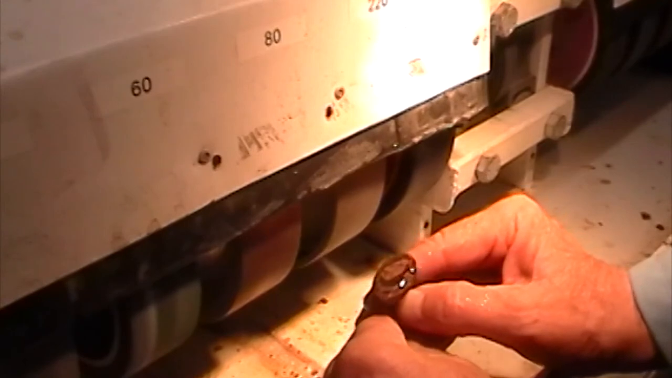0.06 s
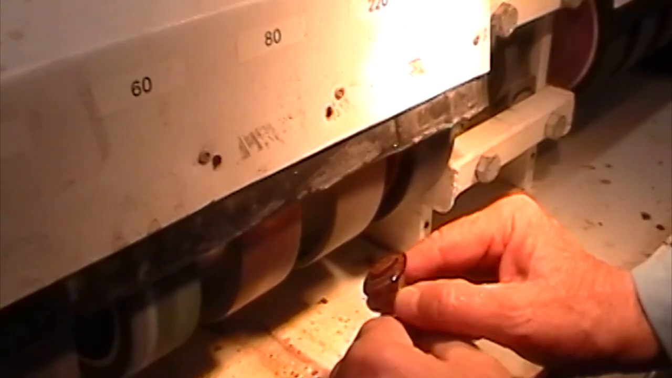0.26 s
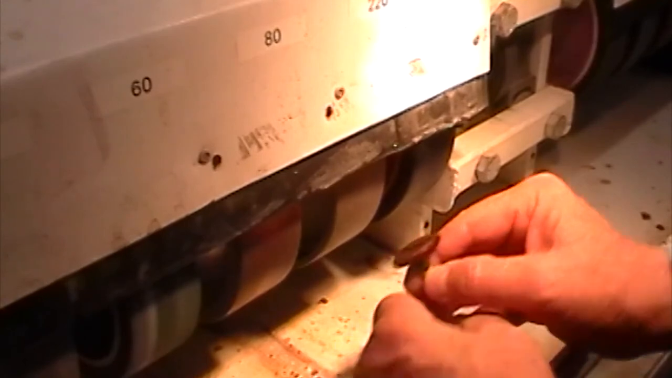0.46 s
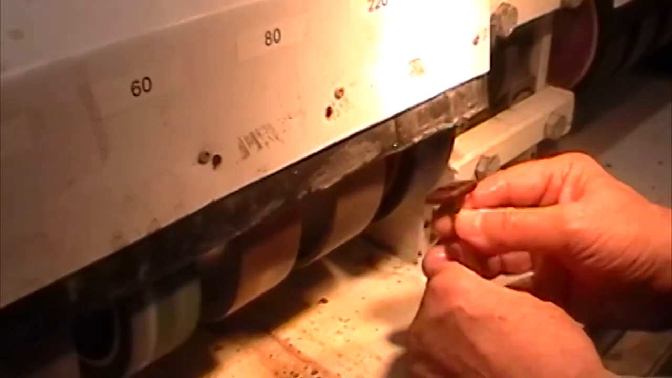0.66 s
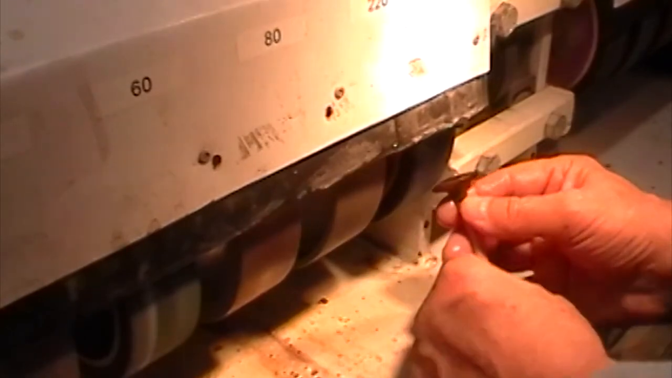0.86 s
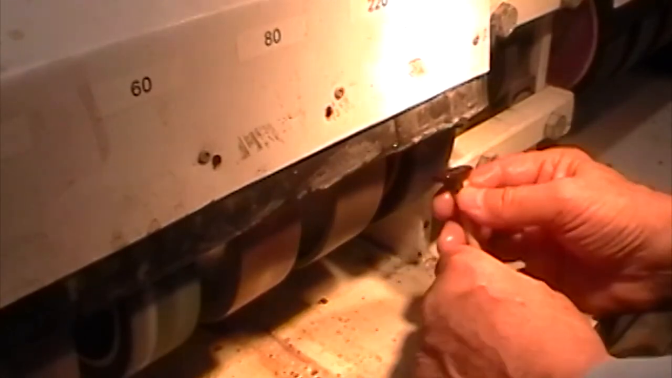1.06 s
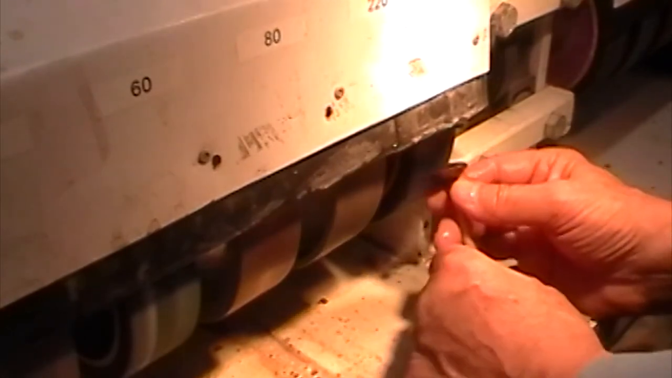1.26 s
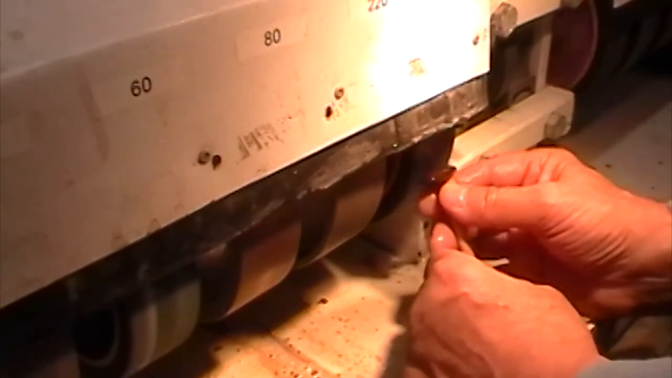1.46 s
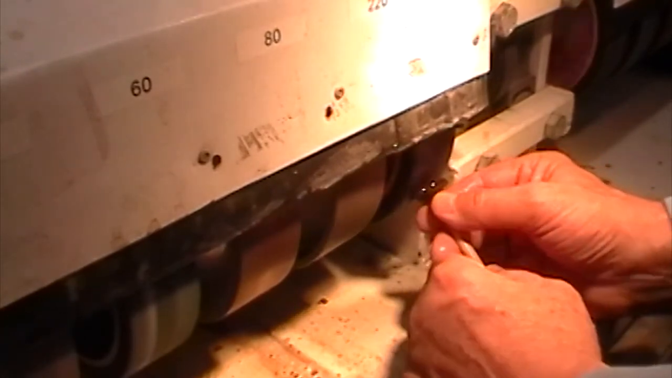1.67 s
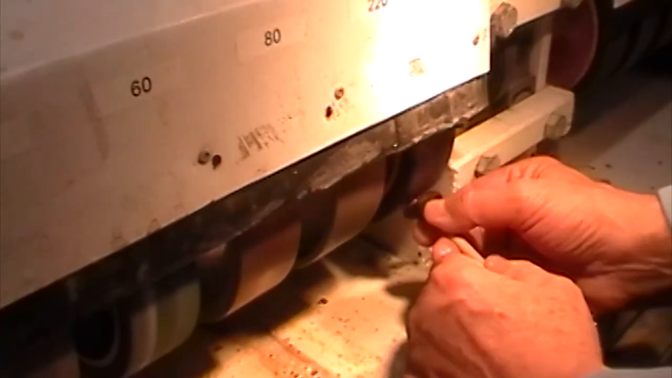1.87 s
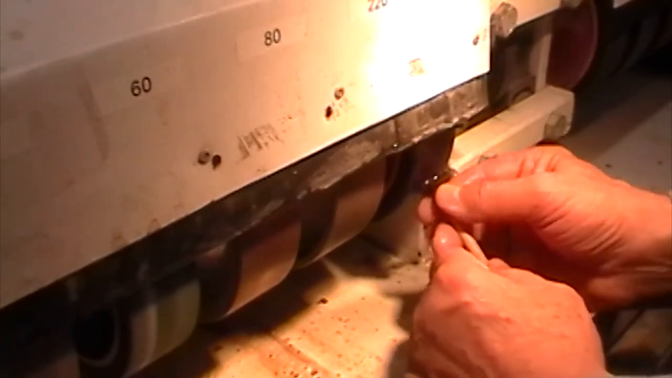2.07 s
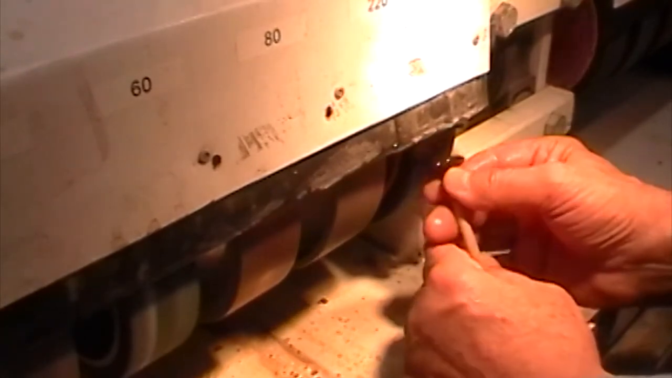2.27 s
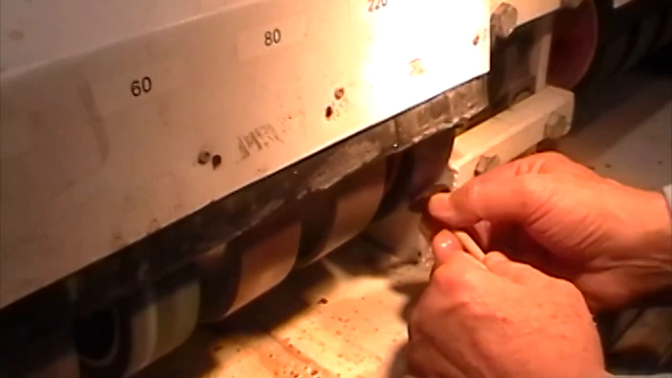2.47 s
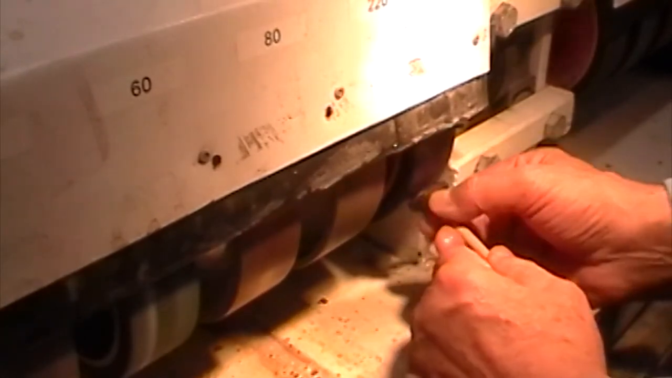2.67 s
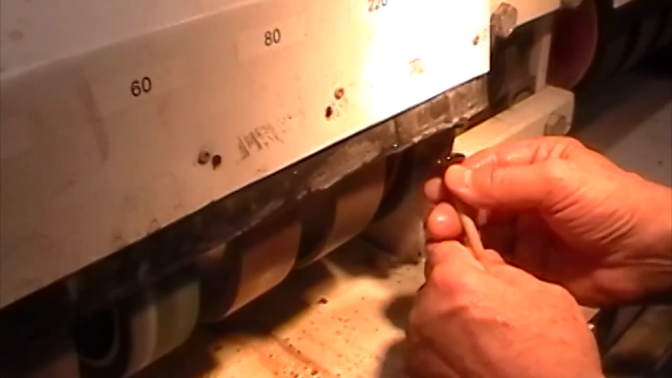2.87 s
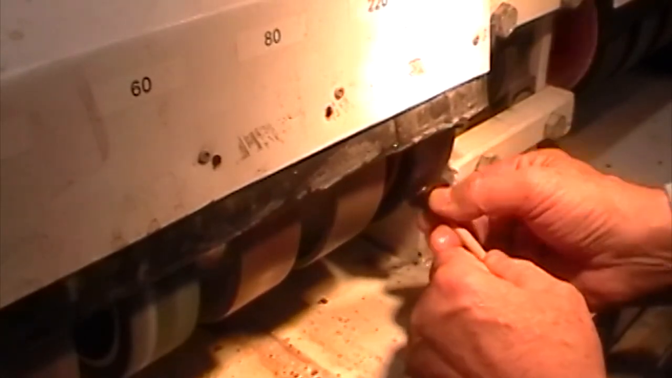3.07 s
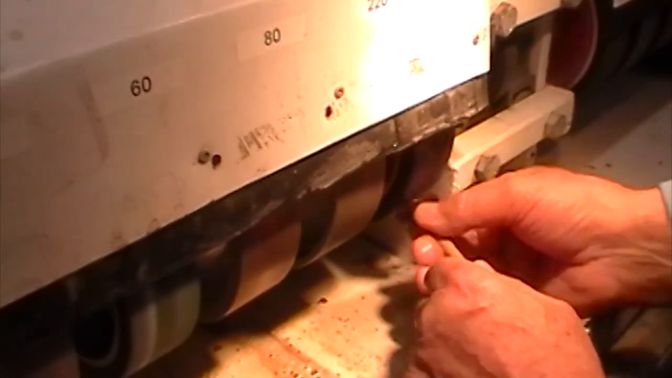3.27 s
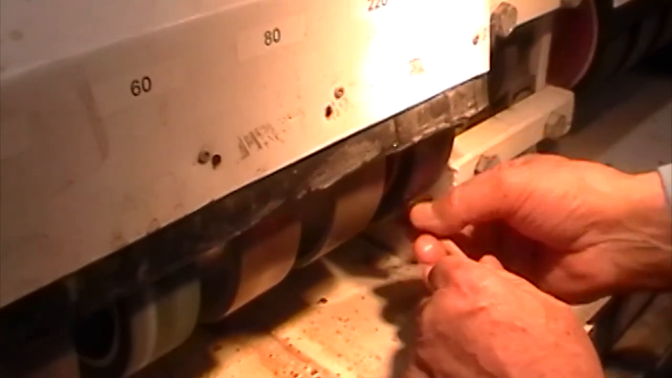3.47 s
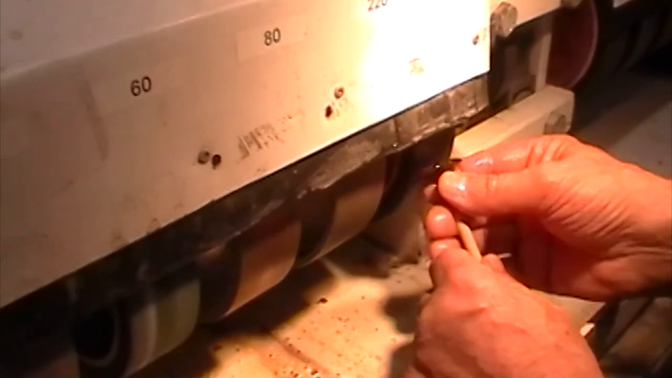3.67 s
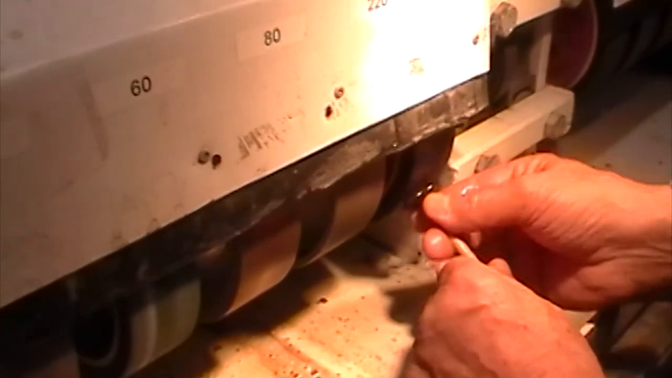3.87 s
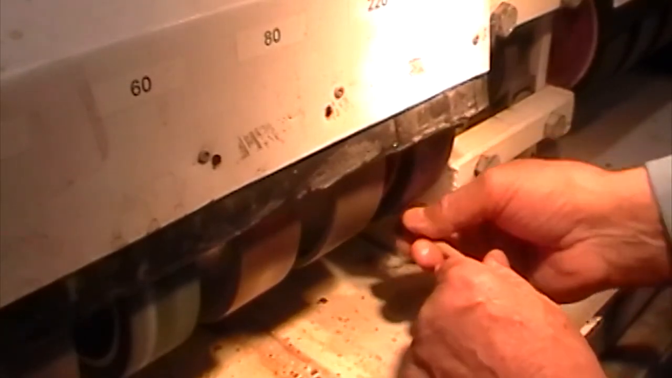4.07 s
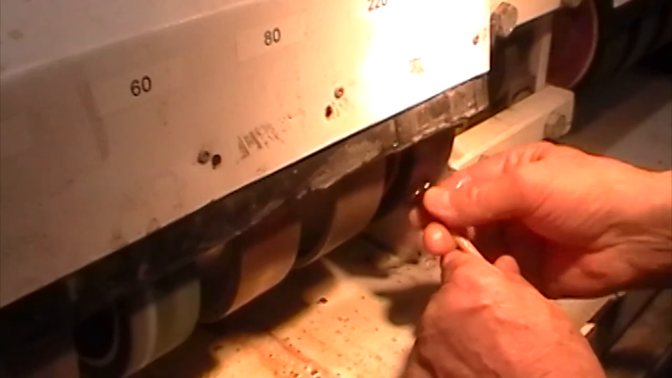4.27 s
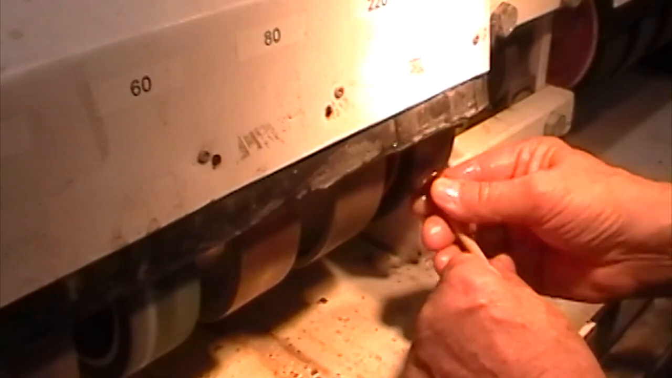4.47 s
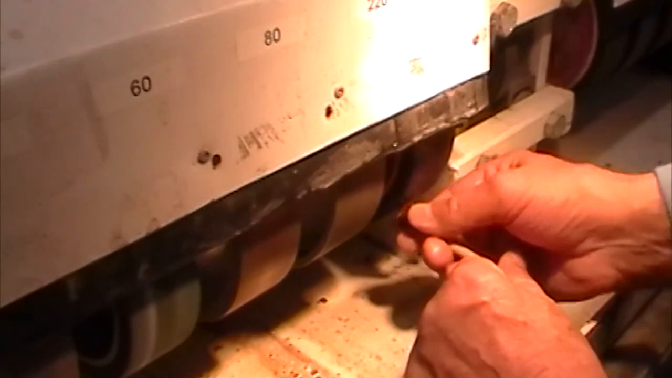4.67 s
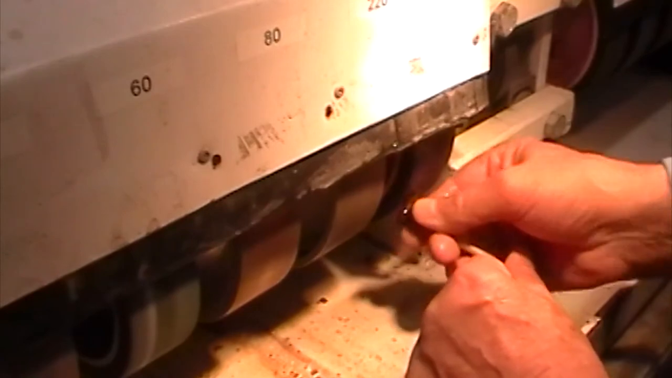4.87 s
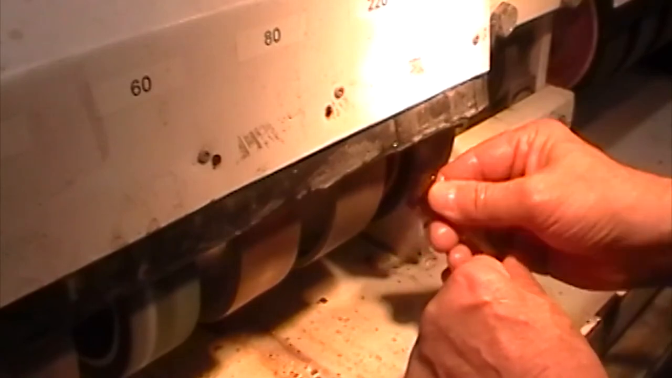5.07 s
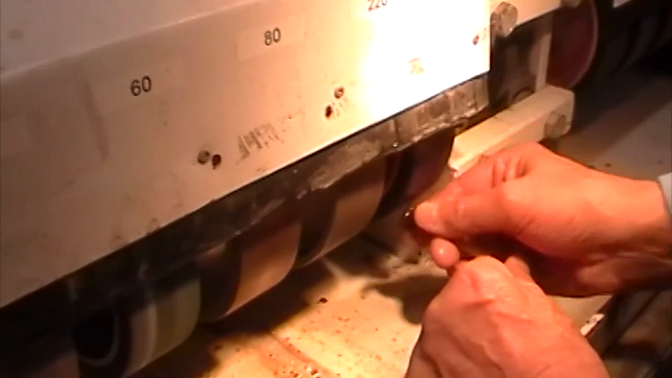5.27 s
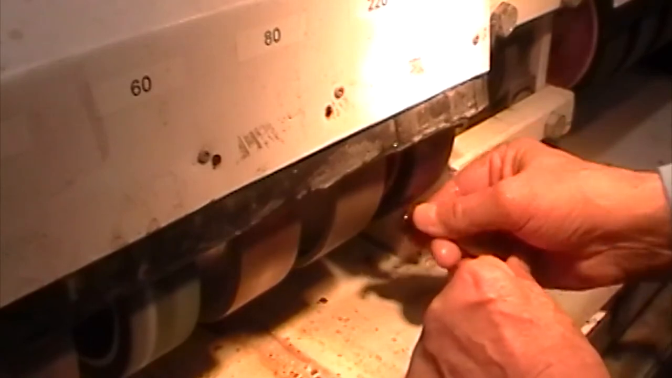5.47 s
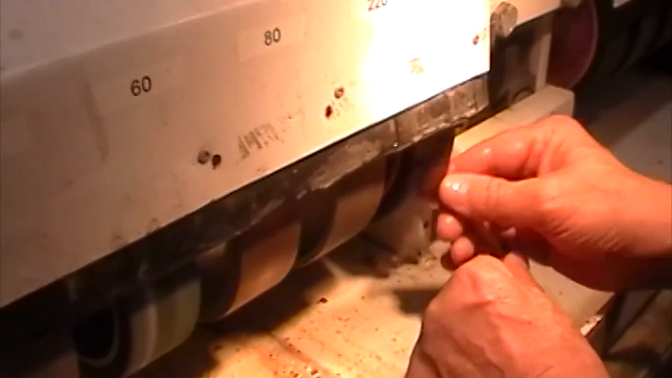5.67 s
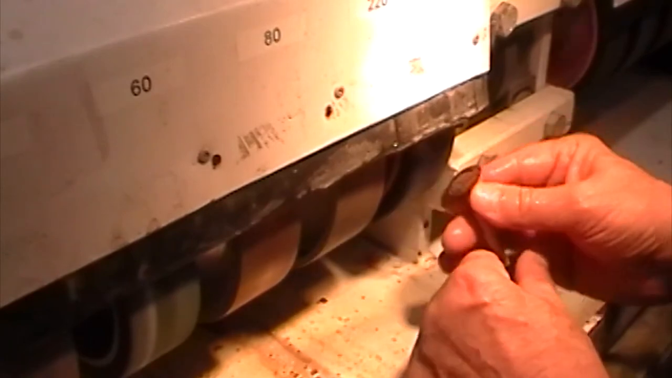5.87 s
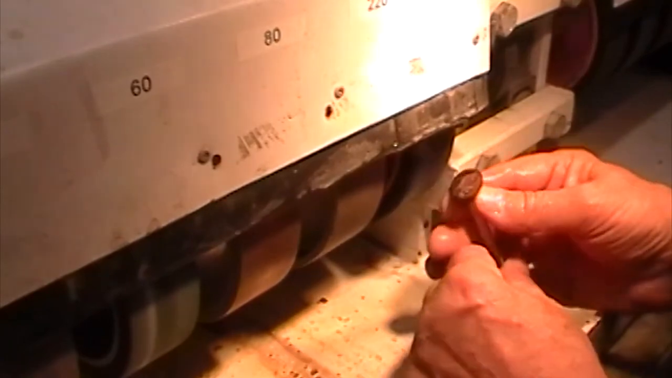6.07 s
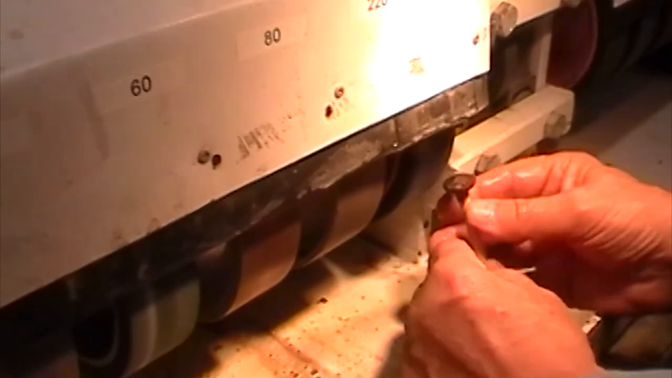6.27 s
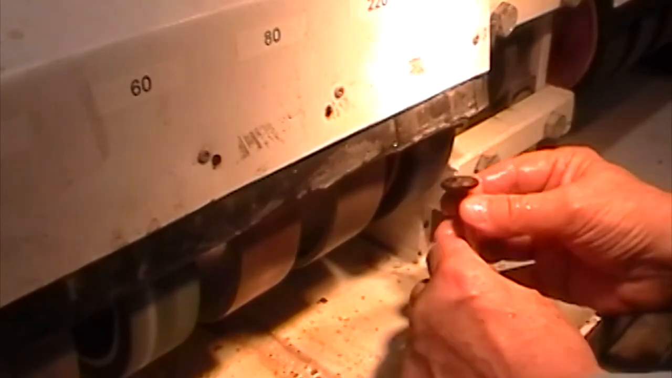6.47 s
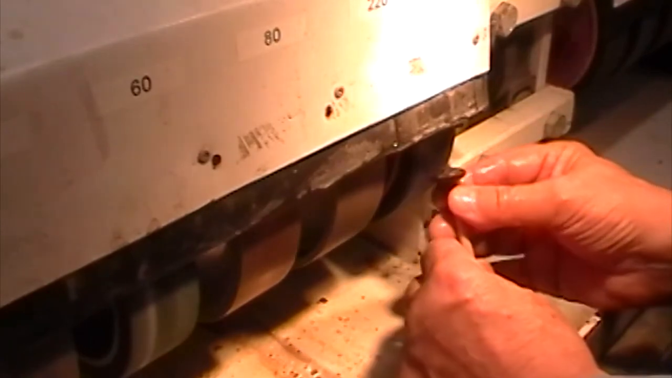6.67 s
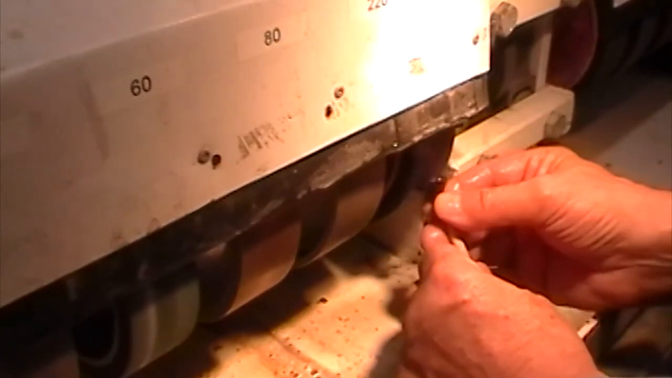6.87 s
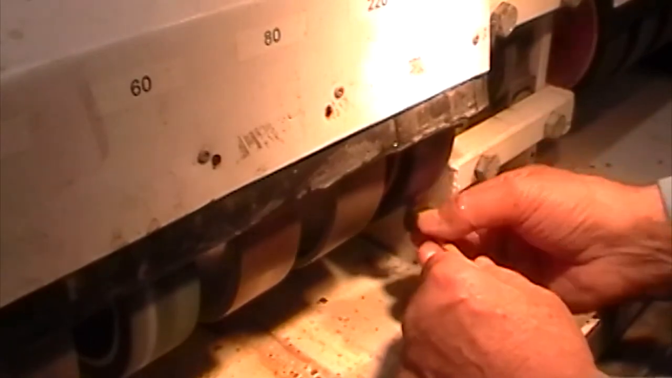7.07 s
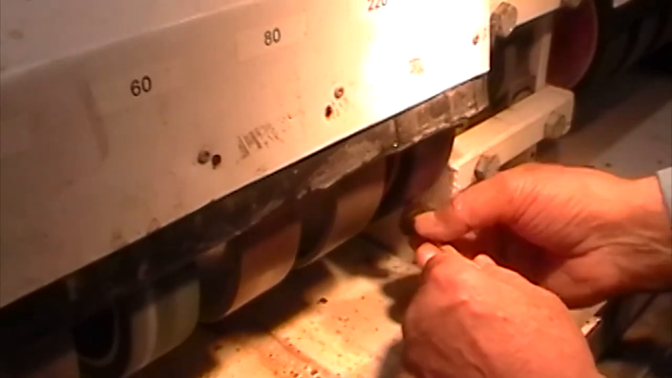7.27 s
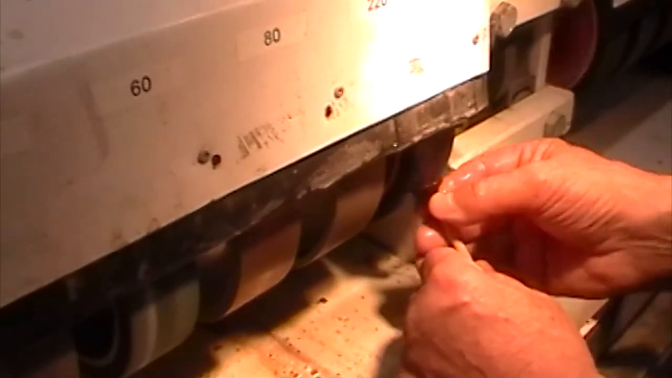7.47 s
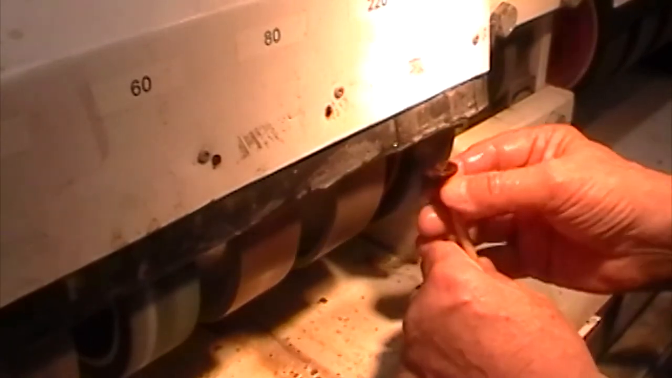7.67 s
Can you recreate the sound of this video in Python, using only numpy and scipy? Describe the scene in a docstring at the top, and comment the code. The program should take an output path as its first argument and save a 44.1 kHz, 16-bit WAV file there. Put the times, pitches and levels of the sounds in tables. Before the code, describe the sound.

Close harsh hissing of stone on a wet grinding wheel, throbbing quickly, lifted away for a second, then resumed above a humming motor.

```python
"""In a workshop, a stone on a stick is ground twice against a wet diamond wheel, close to the microphone.
The motor hums in its housing and the shaking housing rumbles, louder while the stone loads the wheel.
Fine spray hisses throughout; drops flick off before the first pass, and the rim swishes after it.
The stone hisses softly on the water film, then grit scratches ring stone, wheel and hood.
In bouts the grinding throbs once a turn, as the stone bounces on the wheel's high spot."""
import sys
import numpy as np
from scipy import signal
from scipy.fft import rfft, irfft, next_fast_len
from scipy.io import wavfile

SR = 44100
rng = np.random.default_rng(int(sys.argv[2]) if len(sys.argv) > 2 else 0)


def int16_out(signal):
    """Quantize to a 16-bit WAV file."""
    q = np.round(np.clip(np.atleast_2d(signal).T, -1, 1) * 32767)
    wavfile.write(sys.argv[1], SR, q.astype(np.int16))


N = 340452
T = np.arange(N) / SR
SIZE = next_fast_len(N)
HZ = np.fft.rfftfreq(SIZE, 1 / SR)


def amp(db):
    """Decibels to gain."""
    return 10 ** (np.asarray(db) / 20)


def unit(x):
    """Scales to an rms of 1."""
    return x / np.sqrt(np.mean(x ** 2) + 1e-20)


def curves(rows):
    """Each column of a table as a curve over time."""
    s, *columns = np.transpose(rows)
    return [np.interp(T, s, c) for c in columns]


def spectrum(points):
    """Gain at every frequency, drawn through (frequency [Hz], level [dB]) points."""
    hz, db = np.transpose(points)
    return amp(np.interp(np.log(HZ + 1), np.log(hz), db))


def resonances(modes, floor_db=-80):
    """Gain of a set of resonances whose powers add; each is 6 dB down at its half width."""
    power = amp(floor_db) ** 2
    for hz, half_width, db in modes:
        power = power + (amp(db) / (1 + ((HZ - hz) / half_width) ** 2)) ** 2
    return np.sqrt(power)


def below(hz, order):
    """Gain of a low-pass."""
    return 1 / np.sqrt(1 + (HZ / hz) ** (2 * order))


def above(hz, order):
    """Gain of the high-pass that complements the low-pass in power."""
    return np.sqrt(1 - below(hz, order) ** 2)


def colour(x, gain):
    """Filters x and brings it to an rms of 1."""
    return unit(irfft(rfft(x, SIZE) * gain, SIZE)[..., :N])


def noise():
    """Two unrelated noises: one for the middle, one for the stereo side."""
    return rng.standard_normal((2, N))


def wander(hz):
    """Slow chance up to the given rate, at an rms of 1."""
    return colour(rng.standard_normal(N), below(hz, order=3))


def arch(s, length):
    """A smooth rise and fall from 0 to 1 and back, centred on s."""
    return np.cos(np.pi * np.clip((T - s) / length, -.5, .5)) ** 2


def grains(per_s, spread_db):
    """Random tiny impacts, a few much larger than the rest."""
    size = amp(spread_db * np.minimum(rng.exponential(1, N), 4))
    struck = rng.random(N) < per_s / SR
    return unit(rng.choice([-1., 1.], (2, N)) * size * struck)


def hood(x, wet, decay_s, count=40):
    """The metal hood returns a cluster of quick reflections."""
    delay = rng.uniform(.001, .025, count)  # seconds
    size = np.exp(-delay / decay_s) * rng.choice([-1., 1.], count)
    taps = np.zeros(SR // 30)
    taps[(delay * SR).astype(int)] = wet * size / np.linalg.norm(size)
    taps[0] = 1  # direct sound
    return unit(signal.oaconvolve(x, taps[None], axes=1)[:, :N])


WHEEL_HZ = 24.7  # turns per second


def each_turn(place, rise_s, decay_s):
    """A burst that starts near one place of every turn of the wheel, its timing slightly loose."""
    turns = WHEEL_HZ * T - place + 0.017 * wander(7.4)
    age = turns % 1 / WHEEL_HZ
    return unit((1 - np.exp(-age / rise_s)) * np.exp(-age / decay_s))


# stone on the wheel: (start [s], end [s])
PASSES = [(1.647, 5.685), (6.885, 7.8)]


def contact(rise_s=0.0026, release_s=0.0009):
    """1 while the stone touches the wheel, falling to 0 when it is lifted."""
    touch = 0
    for on, off in PASSES:
        attack = np.clip((T - on) / rise_s, 0, 1)
        touch = touch + attack * np.exp(-np.maximum(T - off, 0) / release_s)
    return touch


# how hard the hand presses the stone on: (time [s], grinding level [dB])
PRESSURE = [(1.76, -34), (1.9, -36.5), (2.2, -35), (2.58, -32), (2.98, -32.5), (3.25, -33), (3.5, -37),
            (3.95, -34.5), (4.6, -34), (4.95, -37.5), (5.52, -37), (5.64, -34.5), (6.98, -34.8),
            (7.08, -35.5), (7.5, -34), (7.65, -36.5)]
# the grip eases for a moment: (centre time [s], length [s], level change [dB])
EASES = [(3.382, 0.24, -3.5), (4.08, 0.059, -3.5), (4.282, 0.05, -6), (4.81, 0.3, -1.5)]


def pressure_db():
    """Grinding level: the hand's slow pressure, with its brief easings."""
    return curves(PRESSURE)[0] + sum(db * arch(s, length) for s, length, db in EASES)


# the stone is rolled from spot to spot: (time [s], spot [index])
SPOTS = [(1.72, 0), (2.3, 1), (3.27, 1), (3.48, 2), (4.08, 2), (4.1, 3), (4.7, 3), (4.95, 4), (5.45, 4),
         (5.64, 0), (7.48, 0), (7.85, 1)]


def spot_shares():
    """How much of the contact each spot of the stone has as it is rolled, shape (spots, N)."""
    one_hot = np.eye(len(SPOT_DB))
    return np.array(curves([(s, *one_hot[spot]) for s, spot in SPOTS]))


# what each spot of the stone excites, relative to the grinding level, one row a spot:
# (low ring [dB], rasp [dB], bite [dB], fizz [dB], first core mode [dB], second core mode [dB], rumble [dB])
SPOT_DB = [(-15, -12, -6, -6, -13.5, -22, -13.5), (-27, -13.5, -9.5, -10, -30, -25, -17.5),
           (-20.5, -17, -17, -6, -21, -14, -18.5), (-27, -14, -9.5, -5, -25, -22, -13.5),
           (-20.5, -11, -9, -3, -10, -6, -11.5)]


def excitation_db():
    """Level of each thing that the stone excites: the pressure, weighted by the spot that touches."""
    return pressure_db() + np.transpose(SPOT_DB) @ spot_shares()


# resonances of the machine's housing: (frequency [Hz], half width [Hz], relative level [dB])
HOUSING = [(90, 10.6, -11), (123, 30, -12), (183.6, 11.3, -4), (238, 27, -0.5), (289, 27, 2),
           (335, 21, -3.5), (412, 44, -6), (491.4, 18, -6.5), (690.4, 12.4, -4), (753, 69, -10),
           (824, 216, -10.5), (1263, 370, -14), (1617, 47, -12), (1905, 180, -12), (2510, 170, -19.5),
           (2796, 98, -16.5), (3120, 390, -17), (3810, 340, -22), (4490, 460, -22)]
# motor and bearing tones, before a shared -1.5 dB trim: (frequency [Hz], level [dB])
TONES = [(123.8, -63.5), (179, -67.5), (226.1, -59.5), (301.5, -61.5), (425.3, -72), (484.5, -72),
         (662.1, -65.5), (702, -68), (762, -67.5), (931.3, -72.5), (1179, -68), (1292, -70.5),
         (1410, -69.5), (1631, -73.5), (1750, -68), (1803, -73), (1927, -76), (2300, -72)]
IDLE_DB = -50.5  # rumble of the machine running free


def machine():
    """Bearings and belt shake the housing, more under load; the motor adds wavering tones."""
    load = amp(excitation_db()[-1]) * contact()
    rumble = np.hypot(amp(IDLE_DB), load)
    band = below(5460, order=10) * above(40, order=2) ** 2
    shake = colour(noise(), resonances(HOUSING, floor_db=-31) * band)
    tones = 0
    for hz, db in TONES:
        turns = hz * T + np.cumsum(1.63 * wander(5.47)) / SR  # pitch strays by 1.63 Hz rms
        sine = np.sqrt(2) * np.sin(2 * np.pi * (turns + rng.random()))
        tones = tones + amp(db + 1.8 * wander(5.5)) * sine
    return rumble * shake + amp(-1.5) * tones * np.array([[1], [0]])  # tones in the middle only


# colour of the water spray: (frequency [Hz], relative level per Hz [dB])
SPRAY = [(500, -35), (4000, -8), (5000, -3), (5750, -5), (6500, -3), (7250, -6), (7800, -1), (10000, 0),
         (12600, 1), (14000, -2), (15800, -5)]
# colour of the wet rim's swish: (frequency [Hz], relative level per Hz [dB])
SWISH = [(1500, -30), (5700, -14), (6800, -8), (7250, -13), (7700, 4), (8400, -6), (9200, -1), (10200, -5),
         (11200, 0), (12000, -4), (12600, 1), (13500, -5), (14700, -11), (15600, -9)]
# drops flicked against the hood: (time [s], level at the start [dB], centre frequency [Hz])
DROPS = [(.19, -48, 13000), (.202, -50, 13000), (.286, -55, 12000), (.766, -52, 13000), (.778, -52, 11000),
         (.873, -47, 9800), (.898, -54, 12500), (1.585, -53, 11500)]
WET_DB, WIPED_DB = -60, -67.5  # spray of the dripping wheel, and once the stone has wiped it
SWISH_DB = -65.8


def water():
    """The wheel throws fine spray and a few larger drops; its wet rim swishes once a turn."""
    wet_db = np.interp(T, PASSES[0], [WET_DB, WIPED_DB])  # wiped gradually over the first pass
    droplets = hood(grains(per_s=5000, spread_db=1.0), wet=0.19, decay_s=0.0073)
    droplets = droplets * amp(0.44 * wander(45))
    fling = unit(1.1 + each_turn(place=.05, rise_s=.003, decay_s=.011))
    spray = colour(droplets, spectrum(SPRAY)) * fling * amp(wet_db)
    sweep = each_turn(place=.36, rise_s=.002, decay_s=.011)
    swish = colour(noise(), spectrum(SWISH)) * sweep * amp(SWISH_DB)
    drops = 0
    for s, db, hz in DROPS:
        splash = (T > s) * np.exp(-abs(T - s) / 0.0053)
        drops = drops + amp(db) * splash * colour(noise(), resonances([(hz, 3500, 0)]))
    after_first_pass = T > PASSES[0][1]
    return spray + swish * after_first_pass + drops


# resonances as the stone skims the water film: (frequency [Hz], half width [Hz], relative level [dB])
FILM = [(2750, 110, 2), (3900, 260, -2), (4600, 260, 0), (8450, 200, -3), (10450, 220, -2),
        (12400, 220, -9), (14400, 260, -15)]
# light touches on the film:
# (centre time [s], length [s], level [dB], centre frequency [Hz], spread [octaves])
TOUCHES = [(1.21, 0.24, -56, 10000, 1.0), (1.33, 0.69, -61.5, 7300, 0.57), (1.37, 0.31, -58, 2400, .2),
           (1.45, 0.25, -54, 4200, .25)]


def skim():
    """A soft hollow hiss at each light touch, as the stone nears the wheel and parts its film of water."""
    film, octave = resonances(FILM), np.log2(HZ + 1)
    hiss = 0
    for s, length, db, hz, spread in TOUCHES:
        focus = np.exp(-.5 * ((octave - np.log2(hz)) / spread) ** 2)
        hiss = hiss + amp(db) * arch(s, length) * colour(noise(), film * focus)
    return hiss


# borders of low ring, rasp, bite, main hiss and fizz: (frequency [Hz])
REGISTERS = [2050, 2700, 4400, 5900, 11500, 17000]
# resonances of stone, stick and wheel; levels count within a register:
# (frequency [Hz], half width [Hz], then level when ground on spot 0, 1, 2, 3, 4 of the stone [dB])
BODY = [(2368, 230, -13, -30, -28, -27, -27), (3726, 390, -9.5, -14.5, -11, -9, -8),
        (4110, 280, -24, -31, -12, -19, -22), (4250, 87, -10, -6.5, -19, -7.5, -20),
        (4793, 206, -3, 1, -17, -3, -10.5), (5055, 56, -4, -1.5, -12, -8, -6),
        (5320, 270, -13, -2, -19, -11.5, -14), (5890, 380, -21, -18, -22, -13, -11),
        (6350, 197, -12, -8, -11, -20, -16), (6910, 260, -12, -14.5, -13, -13, -12),
        (7710, 460, -9.5, -4, -6, -9, -11.5), (8000, 240, -12, -5.5, -6, -4, -8),
        (8590, 190, -2, -9, -6, -16, -7.5), (9090, 300, -3.5, -1.5, -0.5, -5, -7),
        (9664, 216, -4.5, 3.5, 1.5, -1.5, -9), (10210, 87, -6, 2.5, -2, -6, -1),
        (10640, 240, -4.5, -1.5, -9, -1, -7), (11000, 330, -11, -4, -7.5, -5, -3.5),
        (11740, 260, -5.5, -5, -11, -4, -13), (12350, 380, 3, -8, -17, 1.5, -10),
        (12900, 300, -6, -1, -11, 2, -2), (13250, 280, 0, -5, -12, -10, -10),
        (13400, 330, -2, -11, -6, 0, -1), (14100, 230, -4, -7, -15, -8, -10),
        (14470, 710, 10, -5, -9, 13, 2), (15000, 270, 12, 4, -4, -3, -2),
        (15644, 213, -7, -25, -16, -15, -17)]
# the wheel's steel core sings: (frequency [Hz], half width [Hz])
CORE = [(7487, 12), (11899, 9)]
# bouts in which the stone bounces on the wheel's high spot:
# (centre time [s], length [s], depth either way [dB], place on the wheel [turns])
BOUNCES = [(2.164, 1, 2.9, -0.46), (2.752, 1, 1.9, -.56), (3.25, 0.27, 3.5, -.59), (3.55, 0.33, 1.5, -0.58),
           (3.98, 0.22, 2.4, 0.0033), (4.21, 0.54, 3.2, -0.4), (4.8, 0.28, 2, -.45),
           (5.447, 0.47, 1.8, -0.31), (7.65, .25, 1.7, -0.27)]
ROLL_RASP_DB = -4.5  # drop of the rasp half-way between two spots


def grind():
    """Grit scratches under a bouncing, chattering force ring the body; each spot has its own ring and echoes."""
    ring_db, rasp_db, bite_db, fizz_db, *core_db, _ = excitation_db()
    shares = spot_shares()
    rolling = 2 * (1 - (shares ** 2).sum(axis=0))  # 1 half-way between two spots

    throb_db = 0
    for s, length, db, place in BOUNCES:
        throb_db = throb_db + db * arch(s, length) * np.cos(2 * np.pi * (WHEEL_HZ * T + place))
    chatter_db = 0.19 * wander(5.8) + 0.56 * wander(50) + 1.0 * wander(580)
    scratches = unit(grains(per_s=16000, spread_db=3.0) * amp(throb_db + chatter_db))

    modes = np.array(BODY)
    hz, half_width = modes[:, 0], modes[:, 1]
    bands = [below(hi, order=20) * above(lo, order=20) for lo, hi in zip(REGISTERS, REGISTERS[1:])]
    gains = amp([ring_db, rasp_db + ROLL_RASP_DB * rolling, bite_db, pressure_db(), fizz_db])
    out = 0
    for share, mode_db in zip(shares, modes.T[2:]):
        body = resonances(zip(hz, half_width, mode_db), floor_db=-25.5)
        ringing = rfft(hood(scratches, wet=0.77, decay_s=0.011), SIZE) * body
        for gain, band in zip(gains, bands):
            out = out + np.sqrt(share) * gain * unit(irfft(ringing * band, SIZE)[:, :N])
    for (core_hz, core_width), db in zip(CORE, core_db):
        out = out + amp(db) * colour(scratches, resonances([(core_hz, core_width, 0)]))
    return out * contact()


# stereo width of grinding, water and skim: (frequency [Hz], side level [dB])
WIDTH = [(2000, -80), (7500, -74), (9000, -72), (10500, -57), (12000, -7.5), (13500, -16.5), (15800, 0)]
# stereo width of the machine's rumble: (frequency [Hz], side level [dB])
MACHINE_WIDTH = [(30, -4), (80, -7), (160, -18), (300, -19), (480, -4.5), (700, -13.5), (1400, -14.5),
                 (2200, -32), (3200, -38), (4200, -45)]
# stereo balance: (frequency [Hz], left minus right [dB])
LEAN = [(60, .4), (120, -1), (240, -2.3), (480, -1.8), (950, -.3), (1900, 0), (9000, 0), (15000, .8)]
# phase lead of the left channel: (frequency [Hz], phase [radians])
LEAD = [(0, -0.56), (260, -0.34), (1380, -0.0), (11500, 0.0), (12800, 0.073), (13500, 0.1), (14000, -0.56),
        (14300, -0.1), (14600, -0.7), (15000, -0.8), (15200, -0.0), (16500, -0.2)]


def scene():
    """All sources in stereo: nearly mono in the middle range, wider in the bass and top treble."""
    near = rfft(grind() + water() + skim(), SIZE)
    far = rfft(machine(), SIZE)
    mid = near[0] + far[0]
    lead = np.interp(HZ, *np.transpose(LEAD))
    lean = np.sqrt(spectrum(LEAN))
    width = near[1] * spectrum(WIDTH) + far[1] * spectrum(MACHINE_WIDTH)
    side = width + 1j * np.tan(lead / 2) * mid  # turns the phase of left and right apart
    return irfft(np.array([mid * lean + side, mid / lean - side]), SIZE)[:, :N]


# dips in the microphone's response: (frequency [Hz], half width [Hz], level change [dB])
DIPS = [(2550, 40, -6), (5720, 70, -8), (7260, 90, -3)]
EDGE_HZ = 15800  # upper band limit


def record(dry):
    """The microphone's narrow dips, then the band limit."""
    response = amp(sum(db / (1 + ((HZ - hz) / half_width) ** 2) for hz, half_width, db in DIPS))
    heard = irfft(rfft(dry, SIZE) * response, SIZE)[:, :N]
    low_pass = signal.firwin(801, EDGE_HZ, window=("kaiser", 9), fs=SR)
    return signal.oaconvolve(heard, low_pass[None], "same")


dry = scene()
out = record(dry)
int16_out(out)
```